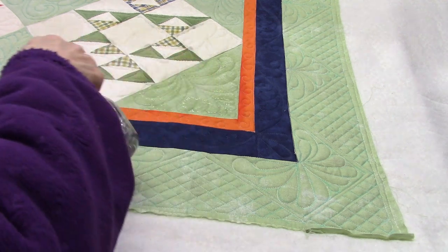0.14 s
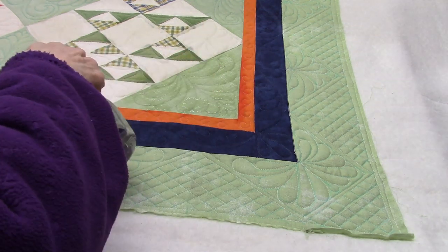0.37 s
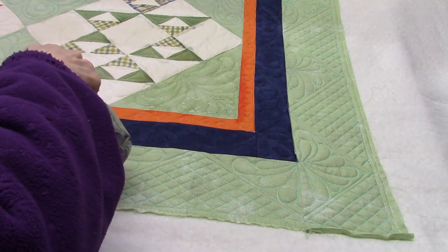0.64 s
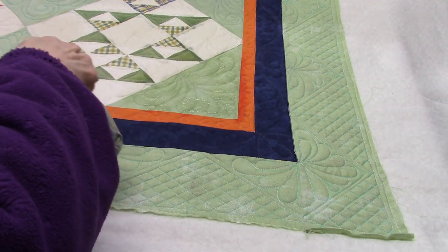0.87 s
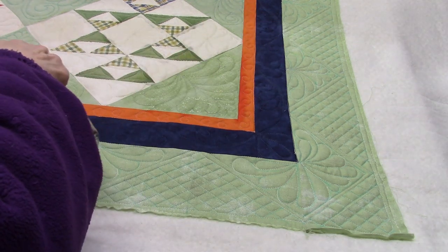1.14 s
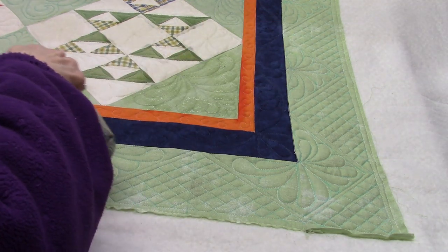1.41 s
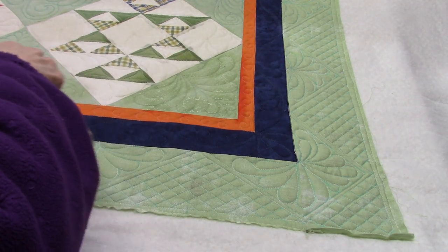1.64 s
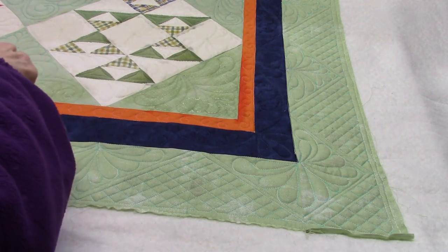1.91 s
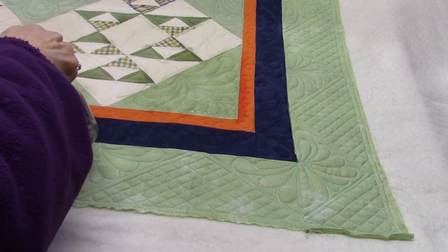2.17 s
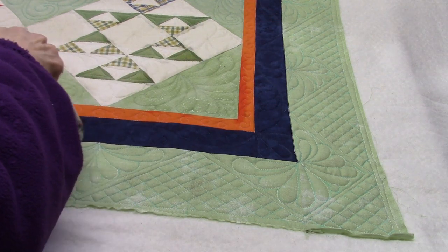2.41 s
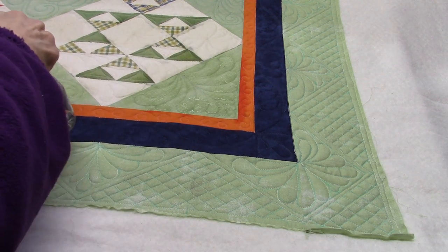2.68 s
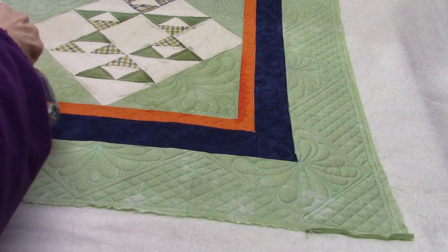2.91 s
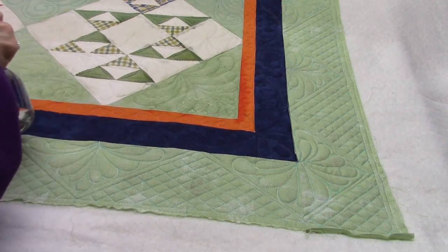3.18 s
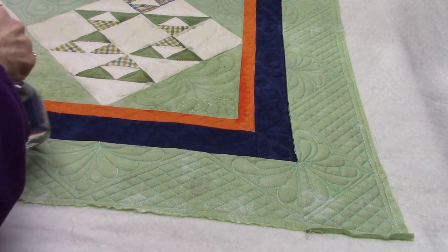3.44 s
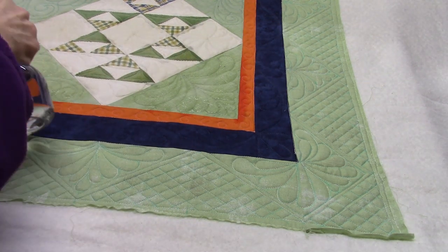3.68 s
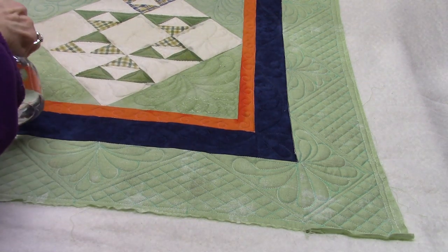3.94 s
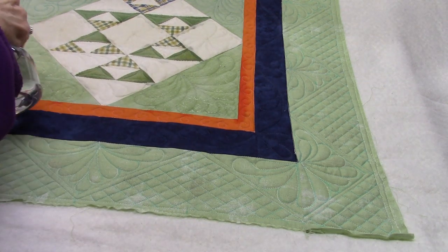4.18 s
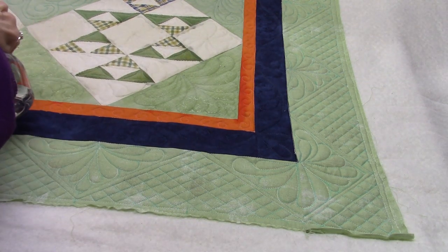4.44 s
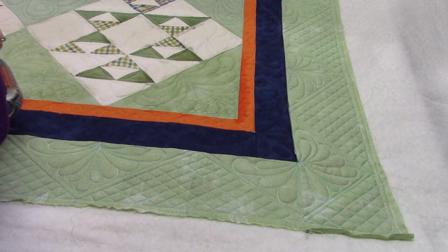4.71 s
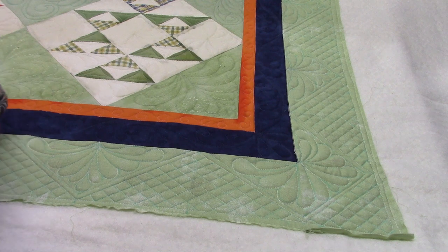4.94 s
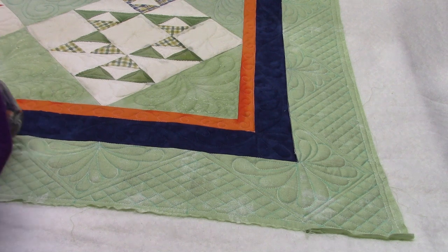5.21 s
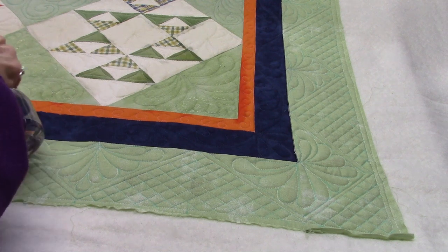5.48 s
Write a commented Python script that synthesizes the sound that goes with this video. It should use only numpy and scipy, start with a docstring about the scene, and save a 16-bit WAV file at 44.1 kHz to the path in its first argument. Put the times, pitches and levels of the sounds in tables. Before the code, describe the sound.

In a quiet, soft-furnished workroom with a low steady hum, a hand spray bottle squirts about three times a second. Each brief hiss swells and cuts off with a soft patter on cloth, between plastic trigger clicks and hollow bottle thumps. After a gap just past three seconds, spraying resumes slightly stronger. Close, dry mono microphone.

```python
"""A workroom with a hum and a rumble, where a hand pumps a trigger spray bottle over a quilt in quick strokes.
Nozzle hiss, mist and patter on cloth are shaped noises that follow each stroke; spits add short bursts.
Trigger ticks, bottle thumps and pump bubbles are short tones; the ticks crack and the thumps rattle too.
A sleeve rustles as swells of clumpy noise. Sparse echoes follow; one close mono microphone hears it all."""
import sys
import numpy as np
from scipy import signal
from scipy.io import wavfile
from scipy.ndimage import uniform_filter1d

SR = 44100
rng = np.random.default_rng(int(sys.argv[2]) if len(sys.argv) > 2 else 0)


def wrap_up_sound(samples):
    """Save the sound to the file named by the first command line argument, as 16-bit audio."""
    columns = np.atleast_2d(samples).T
    # keep every value between -1 and 1, then stretch to whole-number steps
    tamed = np.clip(columns, -1, 1)
    steps = np.round(tamed * 32767).astype(np.int16)
    wavfile.write(sys.argv[1], SR, steps)


def volts_from_decibels(level):
    """Turn decibel levels (scalar or array-like) into linear amplitude factors."""
    exponent = np.asarray(level, float) / 20
    return 10 ** exponent


N = 246519
GAIN_STEP = 32  # samples per step of the stroke gains


def evened(x):
    """Scales to an rms of 1."""
    return x / np.sqrt(np.mean(x ** 2) + 1e-20)


def add(mix, start_s, sound):
    """Mixes a sound in at start_s."""
    part = mix[round(start_s * SR):][:len(sound)]
    part += sound[:len(part)]


def coloured(x, spectrum, patchy_db, size=2048):
    """Shapes x by a spectrum with drifting patches in time and pitch, then evens it."""
    hz, _, z = signal.stft(x, SR, nperseg=size, noverlap=size * 3 // 4)
    point_hz, point_db = np.transpose(spectrum)
    patches = uniform_filter1d(rng.standard_normal(z.shape), size=24, axis=0)
    patches = evened(uniform_filter1d(patches, size=4, axis=1))
    shape_db = np.interp(np.log(hz + 1), np.log(point_hz), point_db)
    z = z * volts_from_decibels(shape_db[:, None] + patchy_db * patches)
    shaped = signal.istft(z, SR, nperseg=size, noverlap=size * 3 // 4)[1]
    return evened(shaped[:N])


def droplets(per_s, spread_db, share):
    """Smooth noise mixed with single drops of very uneven size; share is the drops' part of the power."""
    hits = rng.random(N) < per_s / SR
    sizes = volts_from_decibels(spread_db * np.minimum(rng.exponential(1, N), 4))
    drops = hits * sizes * rng.choice([-1, 1], N)
    return np.sqrt(1 - share) * rng.standard_normal(N) + np.sqrt(share) * evened(drops)


# air noise spectrum: (frequency [Hz], relative density [dB per Hz])
AIR_SPECTRUM = [(40, -11), (90, 4), (160, -4.5), (300, -6), (550, -13), (750, -14), (1000, -21),
                (1900, -21), (4300, -25.5), (9700, -27.5), (14000, -33), (16000, -37)]
# deep rumble level: (time [s], level [dB])
RUMBLE_LEVEL = [(0.0, -41.5), (0.2, -48), (0.39, -39.5), (0.45, -55.5), (0.95, -37), (0.98, -42.5),
                (1.48, -44), (1.82, -34), (1.87, -42.5), (3.89, -39.5), (4.11, -46), (4.79, -40),
                (4.83, -48), (4.89, -32), (4.95, -48), (5.39, -34.5), (5.48, -41), (5.59, -38)]
# deep rumble spectrum: (frequency [Hz], relative density [dB per Hz])
RUMBLE_SPECTRUM = [(15, -11), (30, 17.5), (55, 7), (80, 5), (130, -44)]


def workroom():
    """Air noise, a deep rumble that swells, and a mains hum that wavers a little in pitch."""
    air_db, hum_db = -45, -47  # rms
    hum_hz, waver_hz = 120.8, 2.81
    t = np.arange(N) / SR
    waver = evened(uniform_filter1d(rng.standard_normal(N), size=4000))
    hum_turns = hum_hz * t + np.cumsum(waver_hz * waver) / SR
    hum = np.sqrt(2) * volts_from_decibels(hum_db) * np.sin(2 * np.pi * hum_turns)
    rumble_gain = volts_from_decibels(np.interp(t, *np.transpose(RUMBLE_LEVEL)))
    rumble = rumble_gain * coloured(rng.standard_normal(N), RUMBLE_SPECTRUM, patchy_db=-1.5)
    air = volts_from_decibels(air_db) * coloured(rng.standard_normal(N), AIR_SPECTRUM, patchy_db=0.46)
    return hum + rumble + air


# arm movements: (start [s], length [s], dull drag level [dB], nap rustle level [dB])
ARM_MOVES = [(0.869, 0.11, -40.5, -54), (1.934, 0.21, -51, -65), (2.14, .26, -42.5, -58),
             (2.573, 0.15, -34.5, -50), (2.77, 0.26, -41, -53), (3.067, 0.38, -49.5, -52),
             (3.374, 0.23, -46, -51), (3.562, 0.13, -41.5, -47), (3.662, 0.17, -41, -48.5)]
# dull drag spectrum: (frequency [Hz], relative density [dB per Hz])
DRAG_SPECTRUM = [(120, -10.5), (220, -0.5), (450, -9.5), (800, -13), (1300, -26), (3000, -58)]
# nap rustle spectrum: (frequency [Hz], relative density [dB per Hz])
NAP_SPECTRUM = [(500, -16), (1000, 0), (1900, -3.5), (2400, -7.5), (5000, -16), (12000, -32)]


def sleeve():
    """Fleece and hand dragging over the quilt: soft clumpy noise, one smooth swell per movement."""
    drag_gain, nap_gain = np.zeros((2, N))
    for start_s, length_s, drag_db, nap_db in ARM_MOVES:
        swell = np.hanning(round(length_s * SR)) ** 0.25
        add(drag_gain, start_s, volts_from_decibels(drag_db) * swell)
        add(nap_gain, start_s, volts_from_decibels(nap_db) * swell)
    drag = coloured(droplets(800, 3.1, 0.079), DRAG_SPECTRUM, patchy_db=5.0)
    nap = coloured(droplets(1800, 2.2, 0.39), NAP_SPECTRUM, patchy_db=2.5)
    return drag_gain * drag + nap_gain * nap


# hollow knocks of the bottle: (time [s], peak level [dB], ring centre [Hz], wall rattle re body [dB])
KNOCKS = [(0.226, -35, 287, -13), (0.24, -29, 305, -17), (0.666, -28, 310, -10), (0.936, -30, 292, -11),
          (1.056, -16, 279, -17), (1.397, -28, 270, -12), (1.568, -27.5, 230, -6), (1.72, -27.5, 284, -9),
          (1.902, -25, 228, -16), (2.022, -26.5, 230, -10), (2.327, -28.5, 270, -23),
          (2.575, -28, 189, -28), (2.651, -28, 225, -13), (2.704, -27, 213, -6), (2.972, -16.5, 218, -4),
          (3.134, -28, 200, -11), (3.501, -36, 207, -3), (3.602, -23, 157, -14), (3.76, -30.5, 234, -16),
          (3.807, -20.5, 155, -20), (4.004, -28, 215, -19), (4.185, -17.5, 280, -4), (4.39, -27, 245, -12),
          (4.592, -17, 280, -4.5), (4.785, -27, 243, -18), (4.93, -23.5, 258, -7), (4.974, -11, 330, -18),
          (5.114, -26.5, 230, -10), (5.235, -23, 287, -3), (5.416, -26, 243, -11), (5.546, -24, 264, -3.5)]
# bottle body modes: (frequency [Hz], relative level [dB])
BOTTLE_MODES = [(155, -0.5), (218, 4.5), (295, 2.5), (390, -1.5)]


def thumps():
    """A soft push builds over a few ms and rings the bottle modes nearest its centre; the walls rattle above."""
    t60_s, build_s, lead_s = 0.06, 0.0085, 0.002
    narrow_db_per_oct = 19.6
    out, t = np.zeros(N), np.arange(8000) / SR
    hz, mode_db = np.transpose(BOTTLE_MODES)[:, :, None]
    wall_band = signal.butter(3, [430, 860], "band", fs=SR)
    walls = evened(signal.lfilter(*wall_band, rng.standard_normal((len(KNOCKS), len(t)))))
    shape = volts_from_decibels(-60 * t / t60_s) * (1 - np.exp(-(t / build_s) ** 2))
    for (s, db, centre_hz, rattle_db), wall in zip(KNOCKS, walls):
        # the grip pulls each mode part of the way toward the centre
        pulled_hz = hz ** 0.7 * centre_hz ** 0.2976
        mode_gain = volts_from_decibels(mode_db - narrow_db_per_oct * abs(np.log2(hz / centre_hz)))
        body = (mode_gain * np.sin(2 * np.pi * pulled_hz * (t - 0.006))).sum(0)
        knock = shape * (evened(body) + volts_from_decibels(rattle_db) * wall)
        add(out, s - lead_s, volts_from_decibels(db) * knock / abs(knock).max())
    return out


# bubbles in the pump: (time [s], level [dB], nominal pitch [Hz], length [s])
PUMP_BUBBLES = [(1.101, -25, 2360, 0.0062), (1.118, -23.5, 4470, 0.0042), (2.681, -31.5, 2120, 0.0073),
                (4.959, -37, 2250, 0.0067)]


def bubbles():
    """Air drawn into the pump: short tones that rise as the bubble shrinks."""
    out = np.zeros(N)
    for s, db, hz, length_s in PUMP_BUBBLES:
        t = np.arange(0, length_s, 1 / SR)
        turns = hz * (0.906 * t + 0.12 * t ** 2 / length_s)  # pitch glides from 0.906 to 1.146 of hz
        add(out, s, volts_from_decibels(db) * np.hanning(len(t)) ** 0.5 * np.sin(2 * np.pi * turns))
    return out


# trigger and valve ticks: (time [s], ring peak [dB], ring centre [Hz], bright crack peak [dB])
TRIGGER_TICKS = [(0.269, -37, 1480, -33), (0.4827, -47, 4860, -28), (0.5137, -33.5, 3780, -33),
                 (0.534, -40, 2480, -29), (0.525, -41.5, 750, -48), (0.5424, -34.5, 2360, -29.5),
                 (0.6697, -41, 2900, -28.5), (0.723, -46, 1770, -29.5), (0.9394, -39, 1430, -36),
                 (0.9537, -21, 2330, -12), (0.96, -33.5, 750, -46), (0.978, -30.5, 3750, -28),
                 (1.059, -28, 2240, -21), (1.1012, -26, 2340, -17.5), (1.3348, -43, 1830, -31),
                 (1.364, -40, 3700, -42), (1.4015, -39, 1600, -31), (1.429, -33, 1730, -22),
                 (1.649, -31, 3720, -37), (1.665, -36.5, 780, -50), (1.6794, -29.5, 3420, -26),
                 (1.727, -49, 1840, -30), (1.972, -28, 3620, -30), (1.9789, -33, 1850, -19),
                 (1.9971, -34, 3400, -24), (2.0024, -39, 1820, -31), (2.0252, -36, 3630, -24.5),
                 (2.049, -36, 2160, -34.5), (2.2, -28, 800, -45), (2.2683, -33, 2280, -31),
                 (2.291, -42, 4770, -20.5), (2.335, -30.5, 2000, -21), (2.5955, -18.5, 2220, -26.5),
                 (2.655, -31, 1570, -20), (2.9078, -27, 3750, -33), (2.9738, -6.5, 1950, -13),
                 (3.179, -30.5, 1630, -26.5), (3.214, -27, 3630, -34), (3.2325, -30.5, 1930, -29),
                 (3.65, -33, 1630, -41), (3.809, -30, 4960, -34), (4.043, -32, 2260, -32),
                 (4.0958, -32, 3770, -40), (4.1884, -14, 2350, -22.5), (4.219, -29, 4970, -26),
                 (4.425, -33, 1890, -44), (4.487, -37, 3790, -53), (4.596, -17, 1980, -20.5),
                 (4.884, -38, 3600, -55), (4.9352, -23, 2120, -23), (5.1477, -35, 2310, -36),
                 (5.1868, -41, 1820, -31.5), (5.2405, -23.5, 2160, -21.5), (5.254, -43, 2590, -34),
                 (5.261, -34, 2300, -28), (5.4097, -28, 3280, -33), (5.449, -35, 2690, -40),
                 (5.5476, -25, 2340, -24.5)]
# trigger modes: (frequency [Hz], relative level [dB], 60 dB decay time [s])
TRIGGER_MODES = [(750, 6, 0.037), (1550, -9, 0.022), (1910, 0.5, 0.01), (2250, -6, 0.015),
                 (2910, 2.5, 0.0094), (3630, 4, 0.0076), (4970, 4, 0.007)]


def ticks():
    """Each tick rings the trigger modes nearest its centre, cracks briefly, and rebounds once."""
    hard_db = -19  # ticks above this are full blows of the trigger on its stop
    rebound_s = 0.0043
    crack_t60_s = 0.0061
    out, t = np.zeros(N), np.arange(2000) / SR
    crack_t = t[:250]
    hz, mode_db, t60_s = np.transpose(TRIGGER_MODES)[:, :, None]
    modes = len(TRIGGER_MODES)
    bright = signal.butter(1, [5000, 11000], "band", fs=SR)
    crack_shape = volts_from_decibels(-60 * crack_t / crack_t60_s) * (1 - np.exp(-crack_t / 0.00016))
    for s, db, centre_hz, crack_db in TRIGGER_TICKS:
        rebound_gain, narrow_db_per_oct = (0.68, 17) if db > hard_db else (0.23, 16)
        detune, phase = rng.standard_normal((2, modes, 1))
        away_db = -narrow_db_per_oct * abs(np.log2(hz / centre_hz))
        turns = hz * (1 + 0.013 * detune) * t + phase
        decaying = volts_from_decibels(mode_db + away_db - 60 * t / t60_s) * np.sin(2 * np.pi * turns)
        ring = decaying.sum(0) * (1 - np.exp(-t / 0.0011))
        crack = signal.lfilter(*bright, rng.standard_normal(len(crack_t))) * crack_shape
        tick = volts_from_decibels(db) * ring / abs(ring).max()
        add(tick, 0, volts_from_decibels(crack_db) * crack / abs(crack).max())
        add(out, s, tick)
        add(out, s + rebound_s, rebound_gain * tick)
    return out


# pump strokes, before each layer's own offsets: (valve opens [s], rise [s], fall [s], peak level [dB],
# opening below the peak [dB], nozzle band trim [dB], delay of the first drops on cloth [s])
PUMP_STROKES = [(0.285, 0.071, 0.13, -29, 16.5, 0.5, .002), (0.742, 0.073, 0.13, -26.5, 13, 1, 0.0037),
                (1.097, 0.076, .12, -27, 16, 0.5, 0.0097), (1.443, 0.055, 0.13, -28.5, 7, 2, 0.0028),
                (1.755, 0.073, 0.13, -28, 12, 2, 0.024), (2.047, 0.078, 0.12, -27, 14, -0.5, 0.028),
                (2.369, 0.067, .13, -27.5, 9, 2.5, .016), (2.676, 0.059, 0.14, -28, 14, 0, .012),
                (2.99, 0.078, 0.084, -28.5, 18.5, -2.5, .002), (3.815, 0.084, 0.13, -25, 15.5, -0.5, 0.029),
                (4.233, 0.058, 0.13, -25, 12, -2.5, .012), (4.613, .075, 0.12, -25, 20, -1.5, 0.013),
                (4.953, 0.074, 0.11, -27, 18, -0.5, 0.011), (5.271, 0.06, 0.12, -26.5, 13.5, 0, 0.01),
                (5.57, 0.046, .12, -26.5, 28, 0, .01)]


def flow(layer_db, late_db, rise_bend, fall_bend, lag_s):
    """Gain of one layer in each stroke: a jump as the valve opens, a rounded rise, a steepening fall."""
    fall_db = 25  # drop reached one fall time after the peak
    s, rise_s, fall_s, peak_db, open_db = np.transpose(PUMP_STROKES)[:5, :, None]
    t = np.arange(0, N, GAIN_STEP) / SR - s
    rise_s = rise_s + lag_s
    rise_down_db = (open_db + late_db) * np.clip(1 - t / rise_s, 0, 1) ** rise_bend
    fall_down_db = fall_db * np.maximum((t - rise_s) / fall_s, 0) ** fall_bend
    down_db = np.minimum(rise_down_db + fall_down_db, 150)
    return volts_from_decibels(peak_db + layer_db - down_db) * (t > 0)


def fill(gains):
    """Sums the strokes and holds each gain step over its samples, lightly smoothed."""
    return uniform_filter1d(np.repeat(gains.sum(0), GAIN_STEP)[:N], size=90)


# air pockets bursting from the nozzle: (time [s], level before the layer offsets [dB], length [s])
AIR_SPITS = [(0.427, -6, .008), (0.434, -18.5, 0.021), (1.089, -21, 0.0056), (1.2451, -11.5, 0.0047),
             (1.273, -26, 0.0059), (1.754, -12, 0.0046), (1.914, -18.5, 0.026), (2.0505, -20, 0.004),
             (2.369, -12, 0.0031), (2.482, -7, 0.0084), (2.534, -19, 0.016), (2.677, -12.5, 0.012),
             (2.826, -21, 0.0034), (2.836, -19, 0.02), (2.988, -9.5, 0.0092), (2.999, -5, 0.0086),
             (3.004, -15, 0.018), (3.984, -14.5, 0.008), (4.352, -16, .006), (4.614, -12.5, .005),
             (4.6294, -27, .005), (4.963, -18, 0.0072)]
# nozzle whistle band: (frequency [Hz], relative density [dB per Hz])
NOZZLE_SPECTRUM = [(1500, -64), (3500, -14), (4700, -6), (5700, 0), (6800, -2.5), (8000, -7.5),
                   (12000, -26)]
# fine mist: (frequency [Hz], relative density [dB per Hz])
MIST_SPECTRUM = [(3000, 0), (6000, -26), (8000, 0.5), (10500, 2.5), (13000, -2.5), (16000, -11.5)]
# patter on cloth: (frequency [Hz], relative density [dB per Hz])
CLOTH_SPECTRUM = [(150, -11.5), (350, -2), (750, 0.5), (1200, -2.5), (1700, 0), (2600, -2), (3700, -3),
                  (6000, -10), (10000, -8), (16000, -36)]


def spray():
    """Nozzle whistle band, fine mist and the duller patter on cloth; weak flow sputters most."""
    drip_db, drip_fall_db_per_s = -21.5, 171  # last drops keep landing on the cloth
    s, rise_s, fall_s, peak_db, _, nozzle_db, flight_s = np.transpose(PUMP_STROKES)[:, :, None]
    t = np.arange(0, N, GAIN_STEP) / SR - s
    after = t - rise_s
    drips = volts_from_decibels(peak_db + drip_db - drip_fall_db_per_s * np.maximum(after - fall_s, 0)) * (after > 0)
    jet_flow = flow(layer_db=-0.28, late_db=-0.69, rise_bend=1.5, fall_bend=1.98, lag_s=-0.0016)
    wet_flow = flow(layer_db=-1.36, late_db=2, rise_bend=2.07, fall_bend=1.6, lag_s=-0.002)
    fine_flow = flow(layer_db=0.1, late_db=1.5, rise_bend=1.84, fall_bend=1.5, lag_s=0.0026)
    jet = fill(volts_from_decibels(nozzle_db) * jet_flow)
    wet = fill(np.maximum(wet_flow * (t > flight_s), drips))
    fine = fill(fine_flow)
    weak = 1 - jet / jet.max()
    flutter = uniform_filter1d(rng.standard_normal(N), size=70)
    flutter = evened(uniform_filter1d(flutter, size=70))
    sputter = volts_from_decibels((0.5 + 2.84 * weak ** 3) * flutter)
    for spit_s, db, length_s in AIR_SPITS:
        burst = signal.windows.tukey(round(length_s * SR), 0.6)
        # a burst's rms lies well under its peak, and it is mostly fine mist
        add(jet, spit_s, volts_from_decibels(db - 19.5) * burst)
        add(fine, spit_s, volts_from_decibels(db - 16.0) * burst)
    hiss = coloured(droplets(6000, 2.3, 0.36), NOZZLE_SPECTRUM, patchy_db=2.0)
    mist = coloured(droplets(6000, 17.0, 0.15), MIST_SPECTRUM, patchy_db=0.9)
    patter = coloured(droplets(4000, 5.2, 0.47), CLOTH_SPECTRUM, patchy_db=2.1)
    return sputter * (jet * hiss + fine * mist) + volts_from_decibels(1.5) * wet * patter


def echoes(x):
    """Sparse reflections of random sign, dying quickly among soft furnishings."""
    t60_s, first_s = 0.15, 0.006
    t = np.arange(SR // 2) / SR
    hits = (rng.random(len(t)) < 0.05) * (t > first_s)
    taps = rng.choice([-1, 1], len(t)) * hits * volts_from_decibels(-60 * t / t60_s)
    taps = signal.lfilter([0.4], [1, -0.6], taps)  # dulls the treble
    return signal.fftconvolve(x, taps / np.linalg.norm(taps))[:N]


def scene():
    """Bottle and arm with their reflections, over the room; the same on both channels."""
    near = sleeve() + thumps() + bubbles() + ticks() + spray()
    return np.tile(near + volts_from_decibels(-19.5) * echoes(near) + workroom(), (2, 1))


def band_limit(x):
    """A steep low-pass at the top of the band."""
    return signal.sosfilt(signal.butter(12, 16950, fs=SR, output="sos"), x)


def record(dry):
    """The same sound on both channels, plus faint noise that differs between them, then a band limit."""
    edge_hz, noise_db = 15780, -63.5
    noisy = dry + volts_from_decibels(noise_db) * rng.standard_normal(dry.shape)
    lowpass = signal.firwin(767, edge_hz, window=("kaiser", 7), fs=SR)
    limited = signal.oaconvolve(noisy, lowpass[None], "same")
    return band_limit(limited)


dry = scene()
out = record(dry)
wrap_up_sound(out)
```